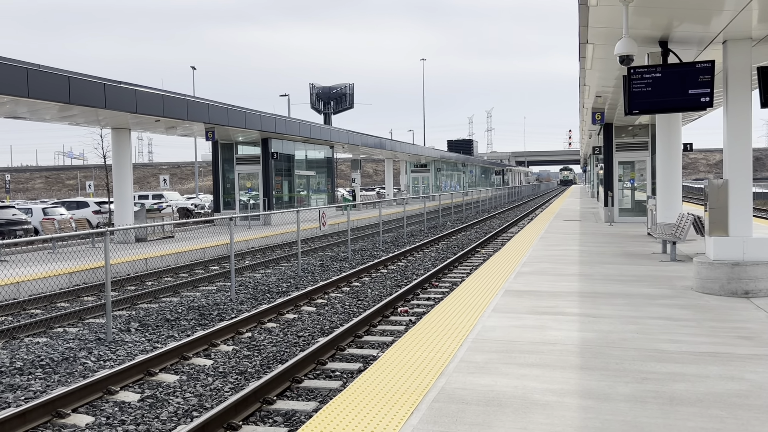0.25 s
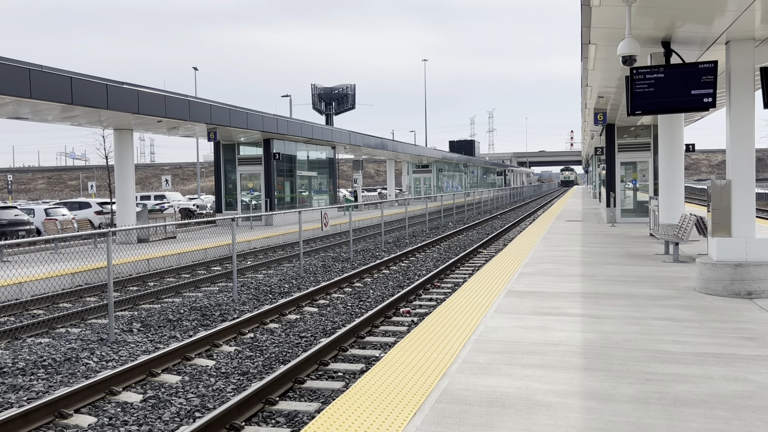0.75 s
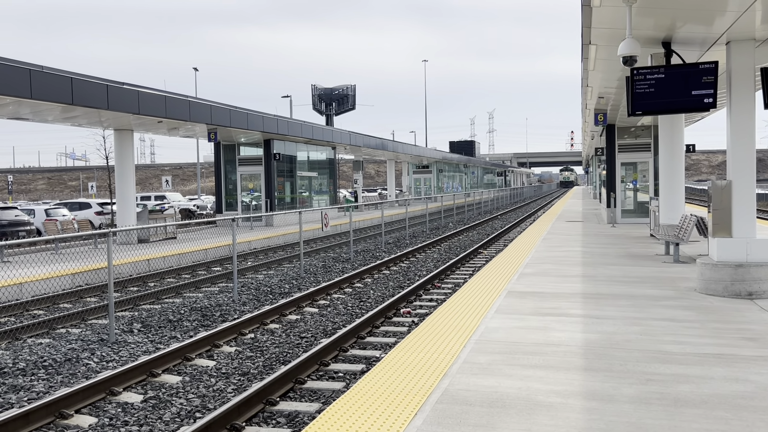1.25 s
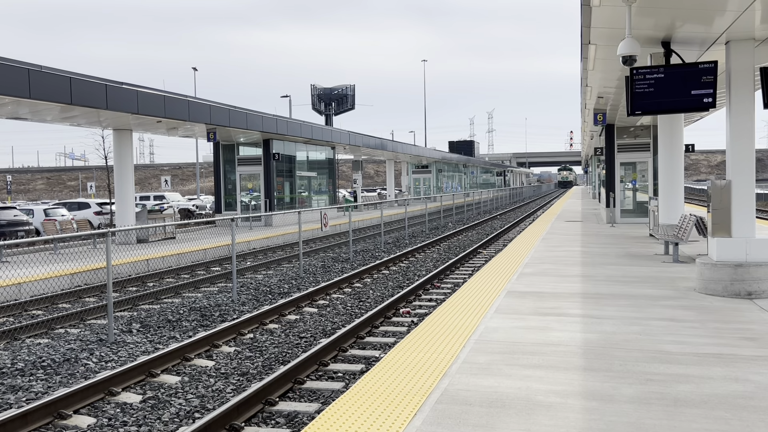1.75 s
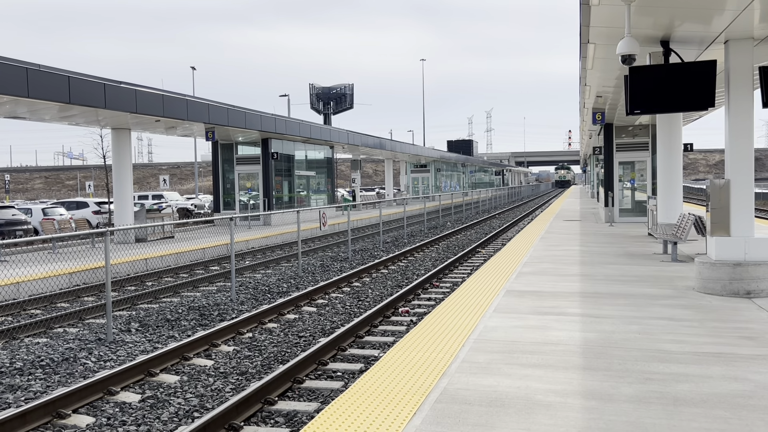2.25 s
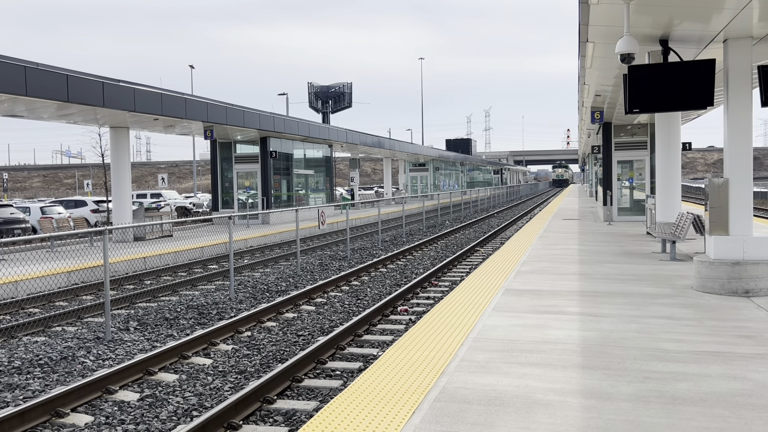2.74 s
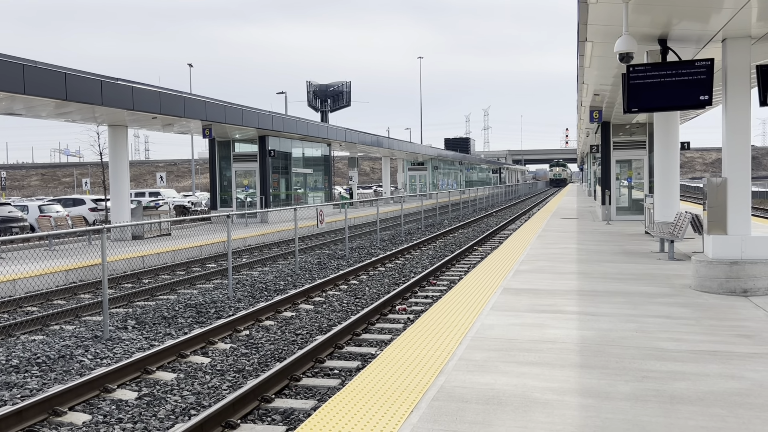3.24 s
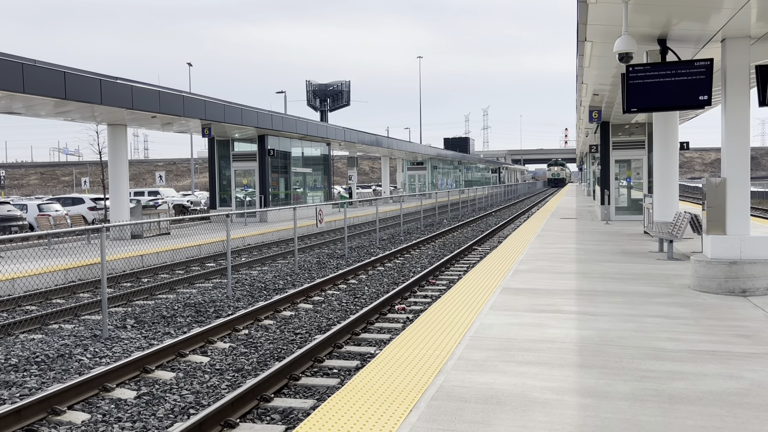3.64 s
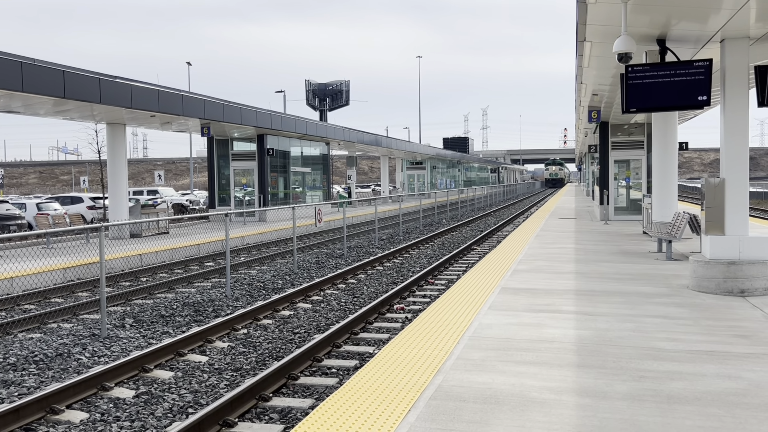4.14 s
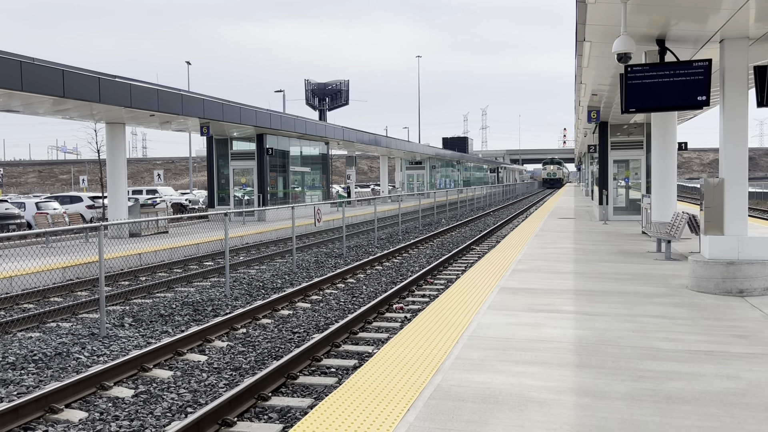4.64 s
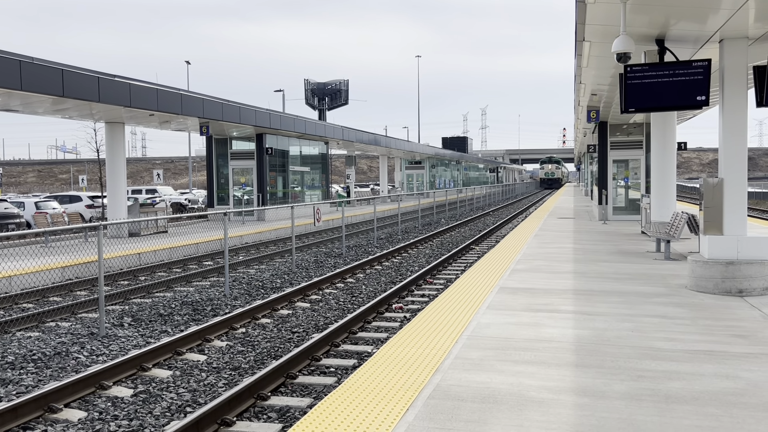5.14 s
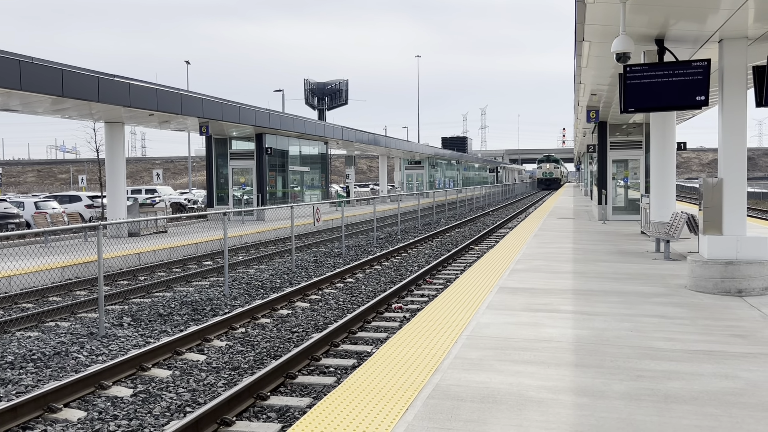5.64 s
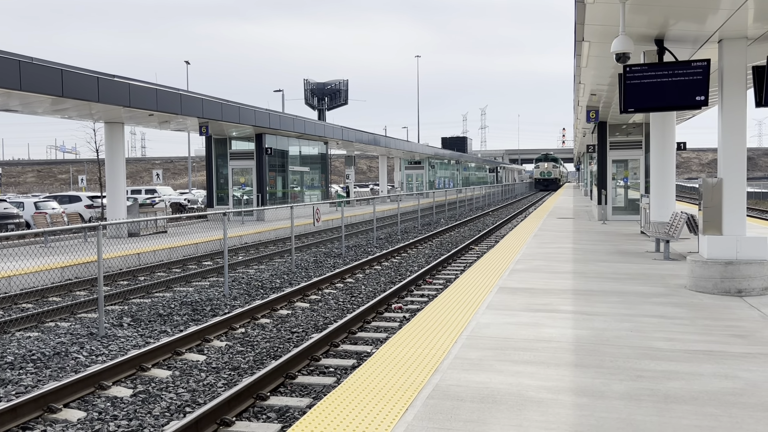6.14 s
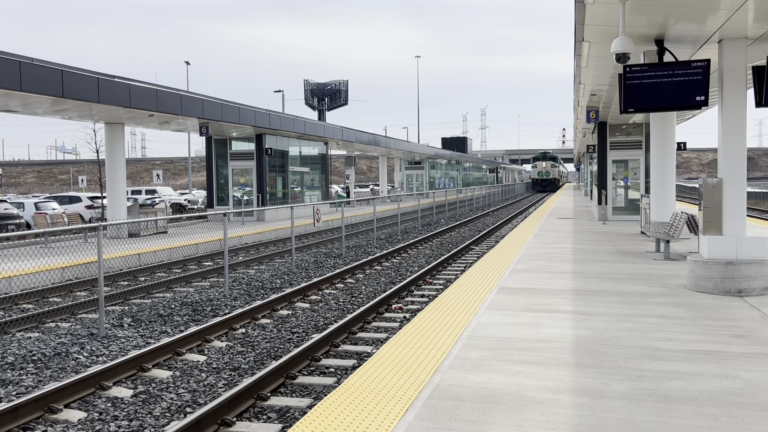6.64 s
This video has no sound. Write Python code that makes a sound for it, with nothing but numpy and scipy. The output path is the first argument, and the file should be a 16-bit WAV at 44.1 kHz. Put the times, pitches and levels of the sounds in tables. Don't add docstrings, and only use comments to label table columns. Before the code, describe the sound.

A locomotive bell clangs steadily every two thirds of a second, growing nearer over a low engine throb and wheel roar at an open platform.

```python
import sys
import numpy as np
from scipy import signal
from scipy.fft import rfft, irfft
from scipy.io import wavfile
from scipy.ndimage import uniform_filter1d

SR = 44100
rng = np.random.default_rng(int(sys.argv[2]) if len(sys.argv) > 2 else 0)


def waveform_to_disk(signal):
    frames = np.transpose(np.atleast_2d(signal))
    scaled = np.clip(frames, -1, 1) * 32767
    samples = np.round(scaled).astype(np.int16)
    wavfile.write(sys.argv[1], SR, samples)


def attenuation_scalar(level_db):
    decades = np.asarray(level_db, float) / 20
    return 10 ** decades


N = 303849
BLOW_PERIOD_S = 0.663

# (time [s], low clang level [dB], high clang level [dB],
# top pair level [dB], top pair fading [dB/s])
STRIKES = [
    (0.3001, -45, -50.5, -73.5, -20),
    (0.9647, -42, -48.5, -56, -64.5),
    (1.624, -39.5, -43.5, -56.5, -30),
    (2.2789, -34, -37, -44, -80.5),
    (2.9431, -32.5, -40, -49.5, -55.5),
    (3.61, -30.5, -38, -55, -36.5),
    (4.2648, -30.5, -38, -49, -41),
    (4.9345, -29, -36.5, -46.5, -43),
    (5.6002, -28.5, -35, -48, -69),
    (6.2633, -29.5, -40, -53, -33),
]


def evened(x):
    return x / np.sqrt(np.mean(x ** 2) + 1e-20)


def read(points, hz):
    f, value = np.transpose(points)
    return np.interp(np.log(hz + 1), np.log(f + 1), value)


def columns(rows, t):
    s, *values = np.transpose(rows)
    return [np.interp(t, s, v) for v in values]


def placed(x, pan_db):
    gains = attenuation_scalar(np.array([[0.5], [-0.5]]) * pan_db)
    return x * gains / gains.mean(0)


def led(pair, radians):
    turn = np.exp(0.5j * np.array([[radians], [-radians]]))
    return irfft(rfft(pair) * turn, pair.shape[1])


def waver(width_hz):
    r = np.exp(-np.pi * width_hz / SR)
    z = rng.standard_normal(N + SR) + 1j * rng.standard_normal(N + SR)
    z = signal.lfilter([1], [1, -2 * r, r * r], z)[SR:]
    return z / np.sqrt(np.mean(abs(z) ** 2))


def tone(hz, rough, width_hz):
    rough = np.clip(rough, 0, 1)
    turn = np.exp(2j * np.pi * np.cumsum(hz) / SR)
    sway = np.sqrt(1 - rough ** 2) + rough * waver(width_hz)
    return np.sqrt(2) * (turn * sway).real


def noise(field_db, hz, same, lean_db, patchy_db):
    a, b, c, d, patches = rng.standard_normal((field_db.shape[1], len(hz), 5)).T
    patches = evened(uniform_filter1d(uniform_filter1d(patches, 12, 0), 8, 1))
    same = np.clip(same, -1, 1)[:, None]
    left = a + 1j * b
    right = same * left + np.sqrt(1 - same ** 2) * (c + 1j * d)
    z = np.array([left, right]) * attenuation_scalar(field_db + patchy_db * patches)
    z = z * attenuation_scalar(np.array([0.5, -0.5])[:, None, None] * lean_db[:, None])
    return signal.istft(z, nperseg=2048, noverlap=1536)[1][:, :N]


def hiss():
    # (frequency [Hz], level [dB per Hz])
    hiss_colour = [(9400, -36.5), (10700, -48), (10900, -16.5), (11250, -21), (11400, -43.5),
                   (12000, -29.5), (12500, -50), (13700, -60), (13900, -14), (14700, -6), (15200, -3.5),
                   (15750, 4), (15820, -45)]
    hz = np.fft.rfftfreq(2048, 1 / SR)
    nearing = np.linspace(-0.5, 0.5, N // 512 + 5)
    colour_db = read(hiss_colour, hz) - 90 * (hz < 9400)
    growth_db = read([(11000, 13), (14000, 2.2)], hz)
    field_db = colour_db[:, None] + np.outer(growth_db, nearing)
    flicker = evened(uniform_filter1d(rng.standard_normal(len(nearing)), 3))
    field_db = field_db + 6 * np.outer((hz > 11600) & (hz < 12500), flicker)
    return attenuation_scalar(-67) * evened(noise(field_db, hz, 1.9 + 0 * hz, 0 * hz, 1.6))


def layer(index, t):
    # (time [s], nearness [dB])
    approach = [(0, 2), (1.2, 2), (2.8, 5.5), (3.15, 3.5), (3.5, 7), (4.3, 10.5), (5.05, 11), (6.4, 15),
                (6.89, 16)]
    # (far level [dB], share of nearness [0-1])
    layers = [(-50, .3), (-54.5, 0.47), (-60.5, 1), (-60.5, 0.91)]
    far_db, share = layers[index]
    return far_db + share * columns(approach, t)[0]


def rolling():
    # (frequency [Hz], level [dB per Hz])
    far_colour = [(13, -42), (22, -21.5), (65, -9.5), (122, -19.5), (474, -26), (745, -23.5), (824, -21),
                  (889, -23), (1230, -35.5), (1710, -33), (1840, -32), (2090, -41.5), (3050, -51.5),
                  (3290, -54.5), (9000, -92.5), (11700, -119), (19800, -120)]
    near_colour = [(13, -33), (22, -17), (65, -3), (145, -15.5), (266, -12), (462, -27), (745, -25),
                   (804, -21.5), (1030, -30), (1300, -10), (1510, -33.5), (1800, -17.5), (2040, -32.5),
                   (3050, -35), (9000, -69), (11700, -112), (19800, -120)]
    # (frequency [Hz], width [Hz], level [dB])
    rail = [(529, 93, -2), (1104, 40, -4), (1414, 41, 11), (1970, 170, -5)]
    # (frequency [Hz], likeness [-1 to 1])
    likeness = [(60, 0.89), (180, 1), (550, 0.57), (1650, 0.11), (4970, 0.83), (15000, 0.21)]
    # (frequency [Hz], left-right [dB])
    lean = [(60, -1), (180, -2.5), (550, -1), (1650, -1), (4970, 3), (15000, -9.5)]
    t = np.arange(N // 512 + 5) * 512 / SR
    hz = np.fft.rfftfreq(2048, 1 / SR)
    near = np.clip(t / 16.0, 0, 1) ** 0.44
    shape_db = np.outer(read(far_colour, hz), 1 - near) + np.outer(read(near_colour, hz), near)
    field_db = shape_db
    for k, (low, high) in enumerate([(90, 240), (330, 760), (1000, 1300)]):
        band = shape_db[(hz > low) & (hz < high)]
        lift_db = layer(k, t) - 10 * np.log10((attenuation_scalar(band) ** 2).sum(0))
        share = read([(150, k == 0), (500, k == 1), (1150, k == 2)], hz)
        field_db = field_db + np.outer(share, lift_db)
    peaks = sum(attenuation_scalar(db) / (1 + ((hz - f) / (width / 2)) ** 2) for f, width, db in rail)
    field_db = field_db + 20 * np.log10(1 + np.outer(peaks, 0.42 + near))
    return attenuation_scalar(1.0) * noise(field_db, hz, read(likeness, hz), read(lean, hz), 1.2)


def squeak(t):
    # (time [s], level [dB])
    squeaks = [
        (0.152, -65.5),
        (.65, -58),
        (1.28, -67),
    ]
    level = sum(attenuation_scalar(db - 22 * (t - s)) * np.clip((t - s) / 0.02, 0, 1) for s, db in squeaks)
    return placed(level * tone(1990 + 0 * t, 0.4, 12), 0.5)


def gears(t):
    hz = 321 - 8.2 * t
    swell_period_s, crest_s = 1, 3.19
    level_db = layer(3, t) + 4 * np.cos(2 * np.pi * (t - crest_s) / swell_period_s)
    whine = tone(hz, 0.6, 12)
    whine = whine + attenuation_scalar(-4) * tone(0.95 * hz, 0.9, 16)
    whine = whine + attenuation_scalar(-10) * tone(2 * hz, 0.9, 20)
    return placed(attenuation_scalar(level_db) * whine, -1.2)


def engine(t):
    # (time [s], engine speed [cycles/s])
    crank = [(0.0, 5.858), (0.8, 5.757), (1.6, 5.674), (2.6, 5.605), (4.0, 5.629), (5.5, 5.634),
             (6.89, 5.608)]
    # (time [s], exhaust level [dB])
    exhaust = [(0, -38.5), (.5, -38), (1.2, -41), (2, -40), (2.5, -37.5), (2.9, -44.5), (3.5, -37.5),
               (4, -38.5), (4.6, -36), (5.1, -40), (5.55, -31.5), (5.9, -37), (6.4, -34.5), (6.89, -32.5)]
    order_lag = {9: .335, 10: .32, 11: .165, 12: .625}
    other_orders = [8, 11, 12, 13, 14, 17, 23.4]
    # (level [dB], wavering [0-1])
    others = [(-15.5, .7), (3.5, 0.5), (4, 0.31), (-5, 0.7), (-13, 0.83), (-22.5, 0.6), (-10.5, 0)]
    turns = np.cumsum(columns(crank, t)[0]) / SR
    ninth_db, = columns(exhaust, t)
    tenth_db = ninth_db - 2 - 7 * np.exp(-t / 0.69)
    other_db = -50 + 0.6 * (ninth_db - ninth_db.mean())
    orders = [(9, ninth_db, 0.1), (10, tenth_db, 0.15)]
    orders += [(k, other_db + db, rough) for k, (db, rough) in zip(other_orders, others)]
    out = 0
    for k, db, rough in orders:
        sway = np.sqrt(1 - min(rough, 1) ** 2) + rough * waver(0.32)
        turn = np.exp(2j * np.pi * (k * turns - order_lag.get(k, 0)))
        out = out + np.sqrt(2) * attenuation_scalar(db) * (sway * turn).real
    return placed(out, -0.9)


def platform(x):
    # (frequency [Hz], time to fall 60 dB [s])
    echo_t60 = [(500, 1), (1500, .8), (3000, 0.8), (6000, 0.41)]
    taps = np.zeros((2, SR))
    at = np.arange(300, SR - 20, 20) + rng.integers(0, 20, (2, (SR - 301) // 20))
    np.put_along_axis(taps, at, rng.choice([-1., 1.], at.shape), 1)
    hz, t, z = signal.stft(taps, SR, nperseg=256)
    fading = attenuation_scalar(-60 * t / read(echo_t60, hz)[:, None])
    tail = signal.istft(z * fading, SR, nperseg=256)[1]
    return signal.fftconvolve(x, tail / np.linalg.norm(tail[0]), axes=1)[:, :N]


def clang(t, pitch):
    short_hz = [1338, 1452, 1500, 1875, 2255, 2440, 2505, 2625, 3095, 3325, 3428, 3615, 4240, 4795, 5240,
                5460, 5930, 6130]
    # (level [dB], time to fall 60 dB [s])
    short_tones = [(-15.5, 0.72), (-7, 0.085), (-1, 0.14), (-9.5, 0.37), (-8, 0.4), (-12, 0.13), (-18, 0.1),
                   (-19.5, 0.1), (-13.5, 0.17), (-15.5, 0.54), (-15.5, 0.33), (-14, 0.18), (-11.5, 0.15),
                   (-22, 0.49), (-32, 0.12), (-29, 0.14), (-35, 0.27), (-30.5, 0.27)]
    # (frequency [Hz], level [dB per Hz])
    clank_colour = [(600, -23), (930, -7.5), (1250, -17.5), (1500, -6), (1900, 2.5), (2050, -16.5),
                    (2300, -6), (3500, -19.5), (5000, -29.5), (6500, -52.5), (8000, -92)]
    # (frequency [Hz], time to fall 60 dB [s])
    clank_t60 = [(900, 0.18), (1300, 0.026), (1440, 0.4), (1600, 0.5), (2000, 0.34), (3500, 0.29),
                 (5500, 0.16)]
    out = np.zeros((2, N + SR))
    u = np.arange(SR // 2) / SR
    late = np.maximum(u - 0.01, 0)
    hz = np.array(short_hz)[:, None]
    db, t60 = np.transpose(short_tones)[:, :, None]
    chance = rng.standard_normal((len(STRIKES), len(short_tones), 3))
    for (s, low_db, high_db, *_), c in zip(STRIKES, chance):
        at = round((s - 0.015) * SR)
        force = [(1600, low_db), (2200, high_db - 4)]
        turn = 2 * np.pi * (hz * pitch[at] * u + c[:, 1:2])
        twin_turn = turn + 2 * np.pi * (0.003 * hz * u + c[:, 2:])
        pair = np.sin(turn) + 0.6 * np.sin(twin_turn)
        level_db = read(force, hz) + db + 3.0 * c[:, :1] - 60 * late / t60
        tones_rise = np.sin(np.pi / 2 * np.clip(late / 0.013, 0, 1)) ** 2
        tones = (attenuation_scalar(level_db) * pair).sum(0) * tones_rise
        f, tau, z = signal.stft(rng.standard_normal(len(u)), SR, nperseg=512)
        colour_db = (read(clank_colour, f) + read(force, f))[:, None]
        z = z * attenuation_scalar(colour_db - 60 * tau / read(clank_t60, f)[:, None])
        clank_rise = np.sin(np.pi / 2 * np.clip(u / 0.009, 0, 1)) ** 2
        clank = signal.istft(z, SR, nperseg=512)[1][:len(u)] * clank_rise
        out[:, at:at + len(u)] += placed(1.66 * tones + attenuation_scalar(22.5) * clank, 0.99)
    return out[:, :N]


def relay(rows, split, t):
    split_hz, twin_fading, third_hz, third_db, third_fading, echo_db = split
    starts = [STRIKES[0][0] - BLOW_PERIOD_S] + [row[0] for row in STRIKES]
    gain = np.zeros(len(t))
    for s, (db, fading, twin_db, *turns) in zip(starts, rows):
        since = np.clip(t - s, 0.03, 1)
        twin = attenuation_scalar(twin_db - twin_fading * since) * np.exp(2j * np.pi * (split_hz * since + turns[0]))
        third = attenuation_scalar(third_db - third_fading * since) * np.exp(2j * np.pi * (third_hz * since + turns[-1]))
        direct = attenuation_scalar(-fading * since) * abs(1 + twin + third)
        echo = attenuation_scalar(echo_db + 2.5 - 6 * since)
        grown = np.clip((t - s + 0.006) / 0.024, 0, 1) ** 0.6
        gain = (1 - grown) * gain + grown * attenuation_scalar(db) * np.hypot(direct, echo)
    return gain


def top_pair(t, pitch):
    before = (STRIKES[0][0] - BLOW_PERIOD_S, 0, 0, -68, -35)
    s, _, _, top_db, fading = np.transpose([before] + STRIKES)
    k = np.searchsorted(s, t, "right") - 1
    since = t - s[k]
    split_hz, start_turns = 4.5, 1.01
    twin = attenuation_scalar(-3 + 12 * since) * np.exp(2j * np.pi * (split_hz * since + start_turns))
    level = uniform_filter1d(attenuation_scalar(top_db[k] + fading[k] * since) * abs(1 - twin), 400)
    return led(placed(level * tone(4318 * pitch, 0.21, 25), 1.0), 0.58)


def ring(t, pitch):
    # main, hum, second and upper tone [Hz]
    long_hz = [1812.3, 815.8, 1619, 2981]
    # (wavering [0-1], its width [Hz], left-right [dB])
    long_tones = [(0.18, 28, -6), (0.29, 4.6, -6), (0.7, 18, -23.5), (0.49, 52, -3)]
    # (level [dB], fading [dB/s], twin level [dB],
    # twin's beat at the blow [turns], third tone's beat [turns]); the hum has one beat for both
    main_blows = [(-57, -7, 2.5, 0.23, 0.24), (-32.58, 23, 0, 0.24, 0.67),
                  (-30.11, 36.5, -16.5, -0.2, 0.43), (-23.5, 33, -1, 0.18, 0.7), (-33, 1, 3, 0.18, -0.34),
                  (-14.48, 39, -3, 0.24, -0.48), (-15, 57, -3.5, 0.16, 0.46), (-16.5, 30, -1.5, 0.26, 0.67),
                  (-17, 28, -9, 0.061, 0.42), (-18.5, 32, 0.7, 0.025, 0.45), (-20, 35, 1.7, 0.2, -0.36)]
    hum_blows = [(-59.5, -11.5, 0.2, 0.51), (-47.5, 16, -11, 0.22), (-53.5, 1.6, -7, 0.22),
                 (-47.5, 9.5, -4.5, 0.28), (-59.5, -7.5, 5, 0.0051), (-44.5, -7.5, -6, -0.4),
                 (-40, 5.5, -18, -0.08), (-41, 2, -3.5, -0.12), (-38, 11, -3.5, 0.25), (-40.5, 5, -8, 0.28),
                 (-44, 4.5, -2, -0.11)]
    second_blows = [(-44, 35.5, 0.8, 0.37, 1.06), (-48.5, 25.5, 4.5, 0.57, 0.9),
                    (-47.5, 24.5, -10, -0.36, 0.69), (-46.5, 21.5, -2.5, 0.61, 0.69),
                    (-47.5, 1, 9.5, 0.21, 0.36), (-53, 7, 5, 0.19, -0.16), (-42.5, 8, -4.6, -0.07, 0.76),
                    (-47.5, 0.8, 10, 0.0024, 0.72), (-36, 12, -1, -0.043, 0.79),
                    (-34.5, 24.5, -12.81, -0.2, 0.63), (-40, 14.5, -3.4, -0.11, 0.89)]
    upper_blows = [(-50.9, 38.03, -1, -0.23, -0.33), (-51.5, 54, 4, -0.48, -0.22),
                   (-51.5, 43, -1.5, 0.15, 0.1), (-46.5, 18, -5.5, -0.37, -0.22),
                   (-47, 40.66, 3, 0.17, -0.14), (-57, 12, 8.0, -0.14, 0.05), (-46, 34, 5.5, 0.49, -0.44),
                   (-46.5, 29, 5, 0.47, -0.15), (-42.5, 35.71, 3.5, -0.78, 0.32), (-47, 34, 6, 0.4, -0.63),
                   (-42.5, 42, 0.5, -0.47, 0.41)]
    # (twin's offset [Hz], twin's fading [dB/s], third tone's offset [Hz],
    # its level [dB], its fading [dB/s], lingering echo [dB])
    splits = [(2.51, 18, -6.5, -5.5, 18.5, -22.5), (1.5, 13, 9, -24.5, 6.5, -30.5),
              (2.1, 17, 4.5, -1, 22.5, -20), (2.34, 50, 8.5, -0.5, 36.5, -28)]
    coarse = t[::32]
    out = top_pair(t, pitch)
    blows = [main_blows, hum_blows, second_blows, upper_blows]
    for rows, split, hz, (rough, width_hz, pan_db) in zip(blows, splits, long_hz, long_tones):
        gain = np.interp(t, coarse, relay(rows, split, coarse))
        out = out + placed(gain * tone(hz * pitch, rough, width_hz), pan_db)
    return out


def scene():
    # (time [s], Doppler pitch factor)
    braking = [(0, 1.0003), (3.5, .9967), (6.89, .9918)]
    t = np.arange(N) / SR
    pitch, = columns(braking, t)
    rung, struck = ring(t, pitch), clang(t, pitch)
    echoes = platform(attenuation_scalar(-15) * rung + attenuation_scalar(-4) * struck)
    return rung + struck + echoes + engine(t) + gears(t) + squeak(t) + rolling()


def low_pass(x):
    return signal.sosfilt(signal.butter(12, 16850, fs=SR, output="sos"), x)


def record(dry):
    bass_cut = signal.butter(2, 37, "high", fs=SR, output="sos")
    mix = signal.sosfilt(bass_cut, dry) + led(hiss(), 0.65)
    return low_pass(mix)


dry = scene()
out = record(dry)
waveform_to_disk(out)
```